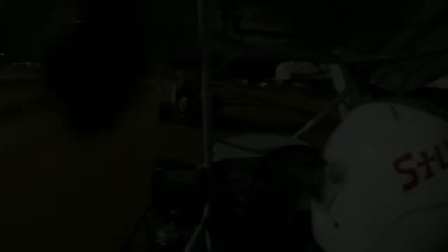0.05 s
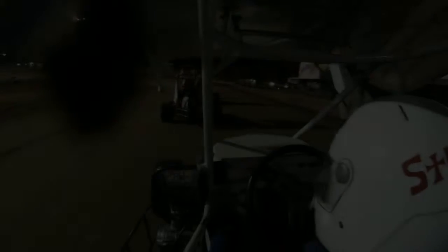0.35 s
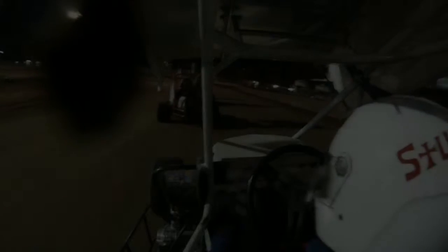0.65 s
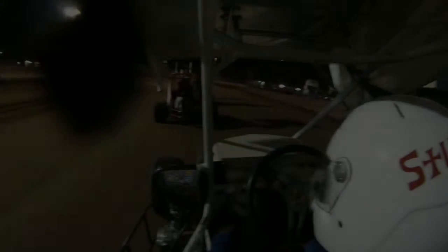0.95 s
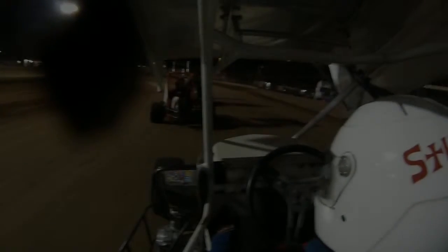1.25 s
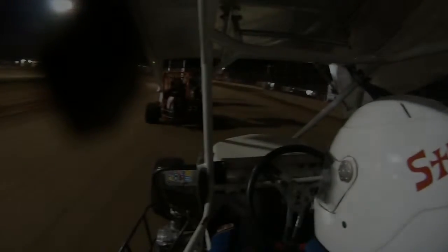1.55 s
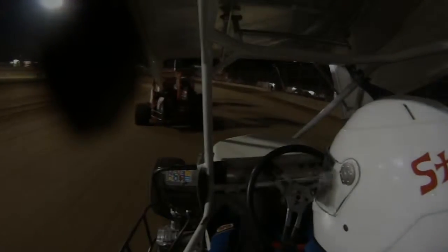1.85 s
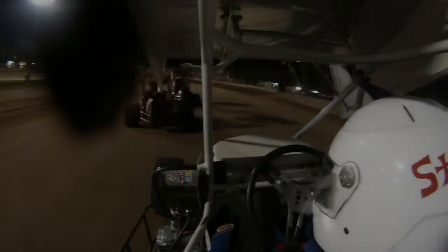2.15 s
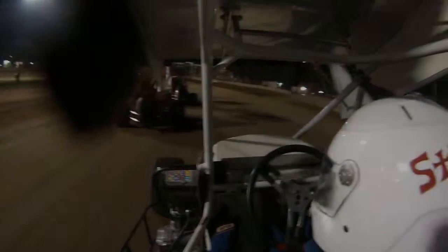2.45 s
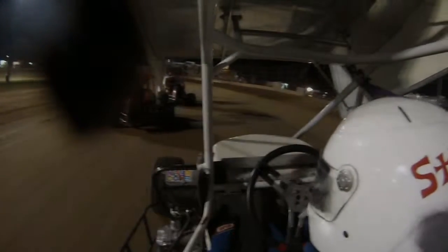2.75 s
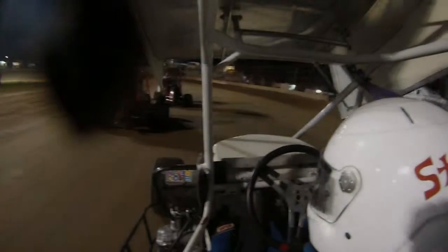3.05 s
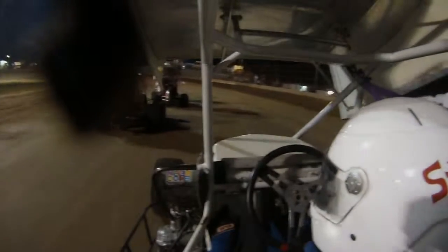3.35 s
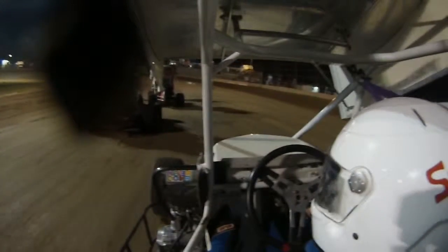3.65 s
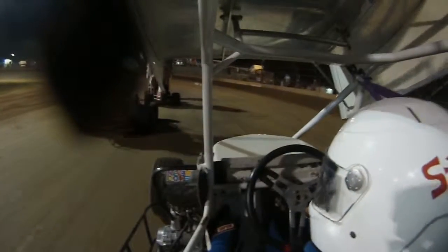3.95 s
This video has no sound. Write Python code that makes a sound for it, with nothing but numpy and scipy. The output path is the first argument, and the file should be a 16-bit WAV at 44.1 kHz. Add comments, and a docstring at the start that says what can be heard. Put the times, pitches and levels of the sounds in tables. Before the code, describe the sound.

A race car engine drones and roars throughout, heard from the cockpit, its pitch wavering only slightly, with gears whining over it. It starts quieter and swells, reaching a loud, rough roar by about 1.8 seconds, easing briefly around 2.5. Low wind buffeting builds while faint grit ticks here and there. Around 3.8 seconds the chassis gives a few quick knocks and the engine pitch dips briefly.

```python
"""Sprint car on a dirt oval

On board a V8 pulling through a turn, heard by a camera in a closed case. One exhaust bank drones
over a rough roar of firings and whining gears, swelling as the engine takes load. Air buffets the
cockpit, grit ticks on the case, and near the end the chassis knocks over ruts."""
import sys
import numpy as np
from scipy import signal
from scipy.fft import rfft, irfft, next_fast_len
from scipy.io import wavfile
from scipy.ndimage import map_coordinates

SR = 44100
rng = np.random.default_rng(int(sys.argv[2]) if len(sys.argv) > 2 else 0)


def dump(signal):
    """Clip the signal to [-1, 1] and save it as 16-bit WAV at the path in sys.argv[1]."""
    limited = np.clip(np.atleast_2d(signal).T, -1, 1)
    pcm = np.round(limited * 32767).astype(np.int16)
    wavfile.write(sys.argv[1], SR, pcm)


N = 176400


def amp(db):
    """Gain of a level in dB."""
    return 10 ** (np.asarray(db) / 20)


def unit(x):
    """x at rms 1."""
    return x / np.sqrt(np.mean(x ** 2) + 1e-20)


def curves(rows):
    """Automation lanes: one value per sample for each column after the time."""
    times, *columns = np.transpose(rows)
    return [np.interp(np.arange(N) / SR, times, column) for column in columns]


def wobble(rate_hz):
    """A smooth random modulator."""
    knots = rng.standard_normal(int(N * rate_hz / SR) + 4)
    return map_coordinates(knots, [np.arange(N) * rate_hz / SR])


def equalise(x, eq):
    """x through a minimum-phase EQ of (freq_hz, gain_db) points, at rms 1."""
    size = 2 * next_fast_len(N // 2 + 8192)
    hz, db = np.transpose(eq)
    gain = amp(np.interp(np.log(np.fft.rfftfreq(size, 1 / SR) + 1), np.log(hz + 1), db))
    cepstrum = irfft(np.log(np.maximum(gain, 1e-5)))[:size // 2]
    cepstrum[1:] *= 2
    response = np.exp(rfft(cepstrum, size))
    return unit(irfft(rfft(x, size) * response, size)[:N])


def partial(cycles, order, drift_rad, flutter_db=3.0):
    """A tone locked to a multiple of the bank's firing rate, unsteady in phase and level."""
    phase = 2 * np.pi * (order * cycles + rng.random()) + drift_rad * wobble(22)
    return unit(np.sin(phase) * amp(flutter_db * wobble(35)))


def hits(rows, eq, t60_s):
    """Short dead blows: a decaying noise burst for each (start_s, level_db), through one EQ."""
    start_s, level_db = np.transpose(rows)
    blows = np.bincount((start_s * SR).astype(int), amp(level_db), N)[:N]
    envelope = signal.lfilter([1], [1, -amp(-60 / (t60_s * SR))], blows)
    return equalise(envelope * rng.standard_normal(N), eq) * np.sqrt(np.mean(envelope ** 2))


# Fader ride of the near bank's drone: time_s, level_db
DRONE_FADER = [(0.0, -30.5), (0.1, -30), (0.24, -35), (0.3, -31), (0.6, -28.5), (0.68, -24), (0.73, -27),
               (1.35, -20), (1.7, -22.5), (2.13, -22), (2.34, -17), (2.6, -19), (2.64, -17.5),
               (3.63, -15.5), (3.74, -21), (4.0, -19.5)]
# Fader ride of the octave above it: time_s, level_db
OCTAVE_FADER = [(0.0, -42), (0.41, -38), (0.83, -43), (1.24, -34), (1.67, -30.5), (1.83, -24), (2.46, -31),
                (3.29, -23.5), (3.32, -27.5), (3.65, -21.5), (3.75, -34), (3.83, -26), (3.92, -41),
                (4.0, -20)]


def exhaust_note(cycles, drone_trim_db=0.5, octave_trim_db=-2):
    """The near bank's clean drone and the octave of all eight cylinders."""
    (drone_db,), (octave_db,) = curves(DRONE_FADER), curves(OCTAVE_FADER)
    drone = partial(cycles, 1, drift_rad=0.036, flutter_db=0.52)
    octave = partial(cycles, 2, drift_rad=0.091, flutter_db=1.66)
    return amp(drone_db + drone_trim_db) * drone + amp(octave_db + octave_trim_db) * octave


def panel_ring(pops, t60_s=0.026, wet=0.59):
    """The wing and body panels smear each pop with a short dense ring."""
    t = np.arange(SR // 10) / SR
    tail = rng.standard_normal(len(t)) * amp(-60 * t / t60_s)
    ring = signal.fftconvolve(pops, tail / np.linalg.norm(tail))[:N]
    return np.sqrt(1 - wet) * pops + np.sqrt(wet) * ring


# Accent of each cylinder, in firing order: level_db
CYLINDER_ACCENTS = [-2, -13, -3.5, 5.5, -1.5, -8, 3, -3.5]


def firings(cycles, gas_share, scatter_db, jitter, pulse_depth):
    """One pop per firing, mixed with the gas noise that each releases."""
    beat = 2 * cycles  # both banks; jitter and lag are fractions of this beat
    firing = np.arange(int(beat[-1]) + 1)
    strength_noise, time_noise = rng.standard_normal((2, 2048))[:, firing]
    strength = amp(np.take(CYLINDER_ACCENTS, firing, mode="wrap") + scatter_db * strength_noise)
    header_lag = 0.15 * rng.standard_normal(len(CYLINDER_ACCENTS))  # unequal pipe lengths
    arrival = firing + np.take(header_lag, firing, mode="wrap") + jitter * time_noise
    onsets = np.interp(arrival, beat, np.arange(N)).astype(int)
    impulses = np.bincount(onsets, strength, N)
    pops = unit(panel_ring(impulses - impulses.mean()))
    pulse = np.interp(beat, firing, strength) * (1 + np.cos(2 * np.pi * cycles))
    gas = unit((1 - pulse_depth + pulse_depth * pulse) * rng.standard_normal(N))
    return np.sqrt(1 - gas_share) * pops + np.sqrt(gas_share) * gas


# Fader rides as the engine takes load: time_s, roar_db, rasp_db, treble_db
LOAD_FADERS = [(0, -40, -38.5, -52), (.12, -38.5, -37.5, -49), (.22, -33, -33.5, -44.5),
               (.55, -32, -33, -45), (.69, -34.5, -34, -45.5), (.73, -36, -37.5, -50), (1, -31, -31, -44),
               (1.42, -30, -30, -43), (1.76, -22.5, -24, -36), (2.2, -23, -23, -36),
               (2.36, -26.5, -27, -40.5), (2.55, -26.5, -27, -40), (2.85, -23.5, -23, -36),
               (3.6, -22, -22.5, -36), (3.71, -24, -26, -37.5), (3.81, -22, -19.5, -34),
               (3.92, -22.5, -22.5, -37), (4, -22, -20, -32)]
# Midrange body of the roar: freq_hz, gain_db
ROAR_EQ = [(240, -48), (400, -11), (483, -3), (679, -1.5), (740, -1.5), (926, 1.5), (1000, -5), (1080, 1),
           (1350, -18), (1760, -38.5), (2970, -120)]
# Upper-mid bite of the rasp: freq_hz, gain_db
RASP_EQ = [(790, -37), (1350, -12.5), (1400, -9.5), (1590, -0.5), (1720, -5), (1920, -3.5), (2300, -11.5),
           (2640, -7), (2770, -7.5), (3610, -15.5), (3950, -35), (5140, -61), (8690, -120)]
# Treble through the case, which rings near 4.4 kHz: freq_hz, gain_db
CASE_EQ = [(3700, -47), (4000, -21), (4300, -2), (4550, 1), (4850, -23.5), (5400, -17.5), (5650, -13.5),
           (6000, -18.5), (6750, -16), (7050, -28), (7900, -21), (8400, -30), (9500, -25), (10700, -32.5),
           (12000, -27.5), (13000, -34.5), (15200, -46)]
# Engine tones riding the roar fader: bank_rate_multiple, level_db
ENGINE_ORDERS = [(.75, -16.5), (1.25, -25), (2.5, -50), (3, -23.5), (3.25, -26), (3.5, -17), (4, -27),
                 (4.5, -12.5), (5, -11), (5.25, -18), (6, -16)]


def engine_roar(cycles, roar_trim_db=-2.3, rasp_trim_db=-0.82):
    """Rough firings in three bands, with engine tones standing out; the upper two bands flicker."""
    roar_db, rasp_db, treble_db = curves(LOAD_FADERS)
    roar = equalise(firings(cycles, gas_share=0.88, scatter_db=1.5, jitter=0.027, pulse_depth=0.11),
                    ROAR_EQ)
    rasp = equalise(firings(cycles, gas_share=0.74, scatter_db=1, jitter=0.01, pulse_depth=0.13),
                    RASP_EQ)
    treble = equalise(firings(cycles, gas_share=0.84, scatter_db=4, jitter=0.01, pulse_depth=0.11),
                      CASE_EQ)
    tones = sum(amp(db) * partial(cycles, order, drift_rad=0.45) for order, db in ENGINE_ORDERS)
    return (amp(roar_db) * (amp(roar_trim_db) * roar + tones)
            + amp(rasp_db + rasp_trim_db + 0.63 * wobble(18)) * rasp
            + amp(treble_db + 0.74 * wobble(23.9)) * treble)


# Gear whine riding the roar fader: bank_rate_multiple, level_db
GEAR_TONES = [(1.822, -13), (4.29, -10), (5.455, -11), (6.37, -16), (7.28, -19.5), (8.2, -17.5),
              (8.57, -21)]
# High whine riding the rasp fader: bank_rate_multiple, level_db
SING_TONES = [(9.11, -7.5), (10.02, -12.5), (15.5, -18), (17.22, -18), (18.03, -18.5)]
# Extra ride on the high whine: time_s, level_db
SING_FADER = [(0, -10), (.17, 3.5), (.5, 0), (.7, -1.5), (1, 0.5), (1.35, -3.5), (1.6, 1), (2.25, 1.5),
              (2.5, -8), (4, -12)]


def driveline(cycles, throb_trim_db=-5):
    """Gears whine and a slow shaft throbs; the highest tones sing out until the middle of the turn."""
    roar_db, rasp_db, _ = curves(LOAD_FADERS)
    (sing_db,), (wind_db,) = curves(SING_FADER), curves(WIND_FADER)
    whine = sum(amp(db) * partial(cycles, order, drift_rad=0.5) for order, db in GEAR_TONES)
    sing = sum(amp(db) * partial(cycles, order, drift_rad=0.42) for order, db in SING_TONES)
    throb = partial(cycles, 0.533, drift_rad=0.67, flutter_db=1.5)
    return amp(roar_db) * whine + amp(rasp_db + sing_db) * sing + amp(wind_db + throb_trim_db) * throb


# Fader ride of the buffeting, shared by the shaft's throb: time_s, level_db
WIND_FADER = [(0, -42.5), (.38, -38), (.48, -34), (1.1, -34), (1.42, -35), (1.7, -28), (2.5, -28.5),
              (3.1, -26), (3.55, -23), (3.7, -20.5), (3.89, -17.5), (4, -24.5)]
# Low boom of the cockpit air: freq_hz, gain_db
BUFFET_EQ = [(12, -37), (25, -23), (38, -8.5), (65, -9), (82, 5.5), (92, -1.5), (104, -12), (120, -13.5),
             (200, -15.5), (265, -19.5), (400, -23.5), (600, -40.5), (1200, -75)]


def wind(trim_db=-1.5):
    """Air buffets the open cockpit."""
    wind_db, = curves(WIND_FADER)
    return amp(wind_db + trim_db) * equalise(rng.standard_normal(N), BUFFET_EQ)


# Cues for single ticks of grit: start_s, level_db
GRIT_CUES = [(.625, -50), (.69, -51), (2.1, -41), (2.8, -44), (3.235, -38), (3.6, -41), (3.745, -41),
             (3.925, -45)]
# Bright tick of dirt on the case: freq_hz, gain_db
TICK_EQ = [(3000, -30), (6000, 3), (10000, 6), (13500, -5), (15500, -21)]


def dirt_spray(grain_count=40, trim_db=-18, scatter_db=2.5):
    """Grit ticks on the case, among fine random grains that land harder with the throttle open."""
    _, _, treble_db = curves(LOAD_FADERS)
    grains = []
    for position, chance in rng.random((grain_count, 2)):
        accent_db = -scatter_db * np.log(1 - chance)  # mostly soft, a few hard
        grains.append((position * N / SR, treble_db[int(position * N)] + trim_db + accent_db))
    return hits(GRIT_CUES + grains, TICK_EQ, t60_s=0.023)


# Cues for the ruts: start_s, level_db
RUT_CUES = [(3.746, -13), (3.818, -13), (3.824, -12)]
# Hard midrange knock of the chassis: freq_hz, gain_db
KNOCK_EQ = [(150, -45), (450, -8), (750, 6), (1200, -4), (2500, -10), (4000, -52), (7000, -50)]


def chassis_knocks():
    """The chassis knocks as the car crosses ruts."""
    return hits(RUT_CUES, KNOCK_EQ, t60_s=0.039)


# Firing rate of one cylinder bank, which tunes the whole car: time_s, pitch_hz
BANK_PITCH = [(0.0, 172.9), (0.11, 171.8), (0.23, 179.1), (0.33, 178), (0.52, 180.7), (0.62, 170.0),
              (0.72, 173.3), (1.0, 173), (1.35, 170.8), (1.55, 173.6), (1.74, 177.2), (2.15, 174.6),
              (2.5, 168.5), (2.75, 167.9), (3.05, 168.9), (3.65, 169.6), (3.79, 163.8), (4.0, 167.5)]


def scene():
    """Engine and driveline on one wavering pitch, with air, grit and ruts, in mono."""
    bank_hz, = curves(BANK_PITCH)
    cycles = np.cumsum(bank_hz * (1 + 0.002017 * wobble(25))) / SR  # one per firing of the bank
    car = exhaust_note(cycles) + engine_roar(cycles) + driveline(cycles)
    return (car + wind() + chassis_knocks() + dirt_spray())[None]


def record(dry, cutoff_hz=15300):
    """A brick-wall low-pass takes off the very top."""
    size = next_fast_len(N + 8192)
    passband = np.fft.rfftfreq(size, 1 / SR) < cutoff_hz
    return irfft(rfft(dry, size) * passband, size)[:, :N]


dry = scene()
out = record(dry)
dump(out)
```